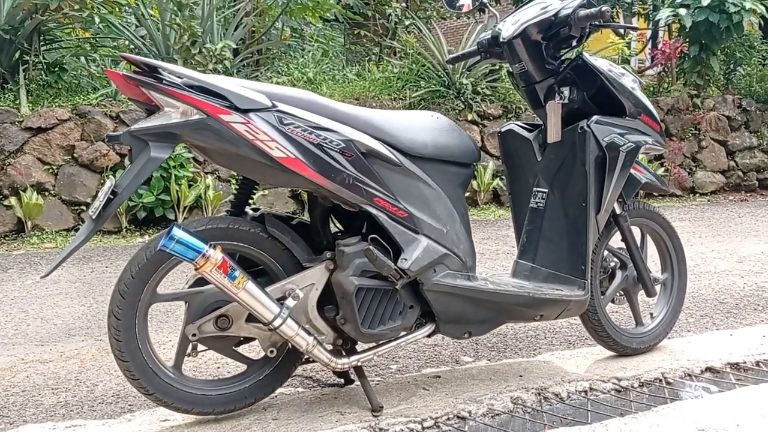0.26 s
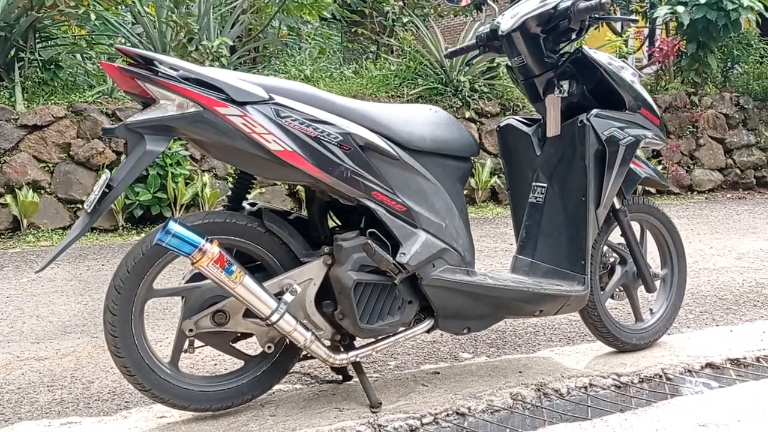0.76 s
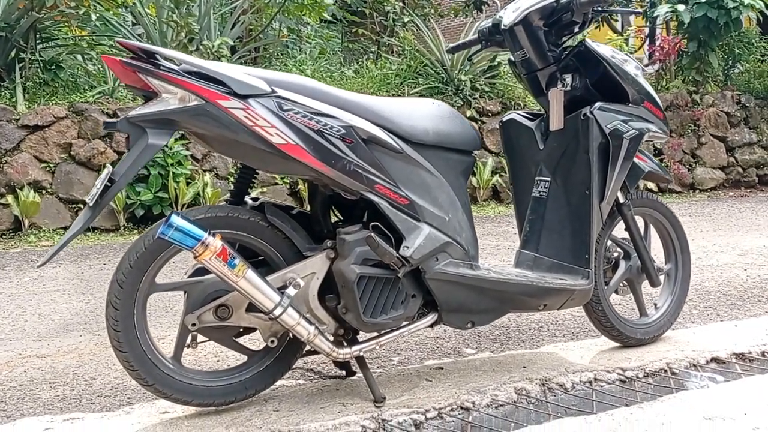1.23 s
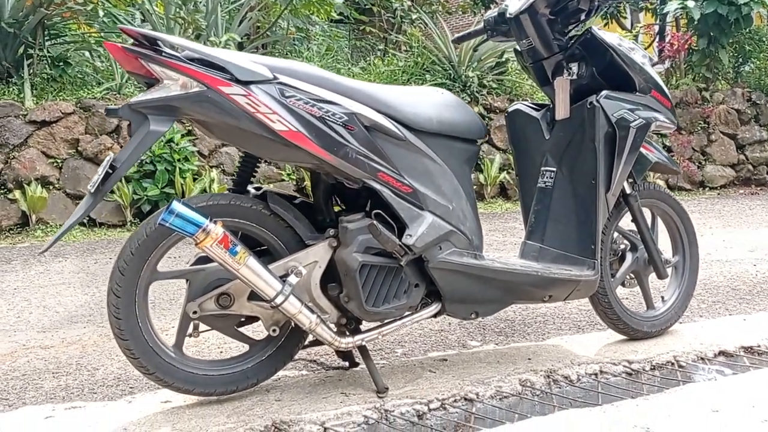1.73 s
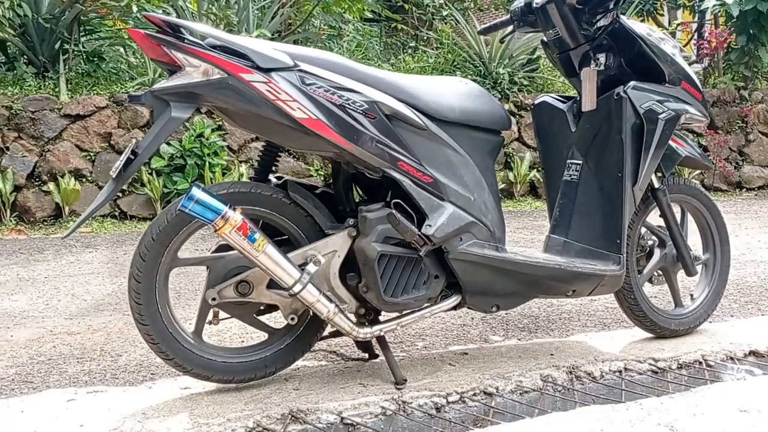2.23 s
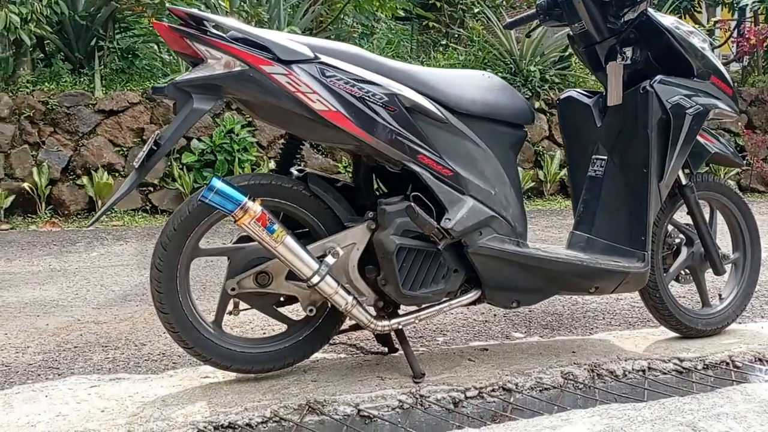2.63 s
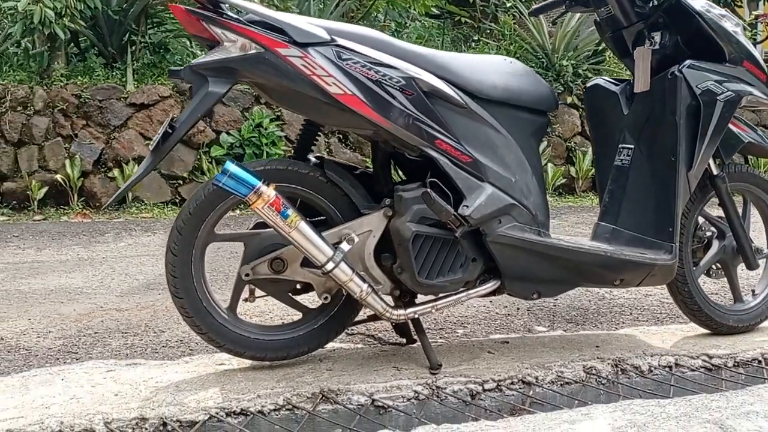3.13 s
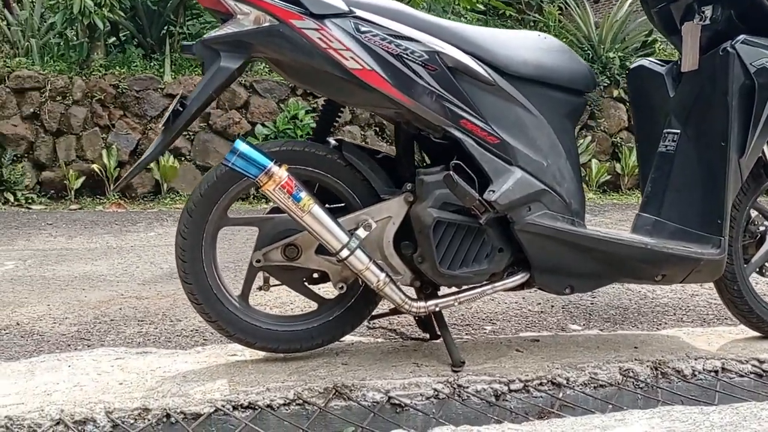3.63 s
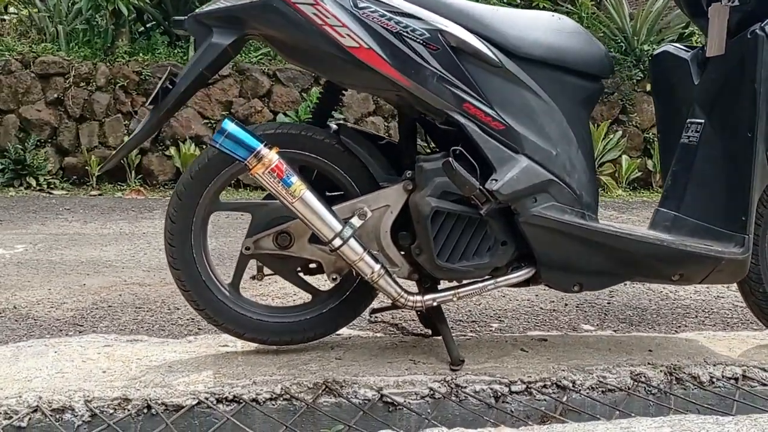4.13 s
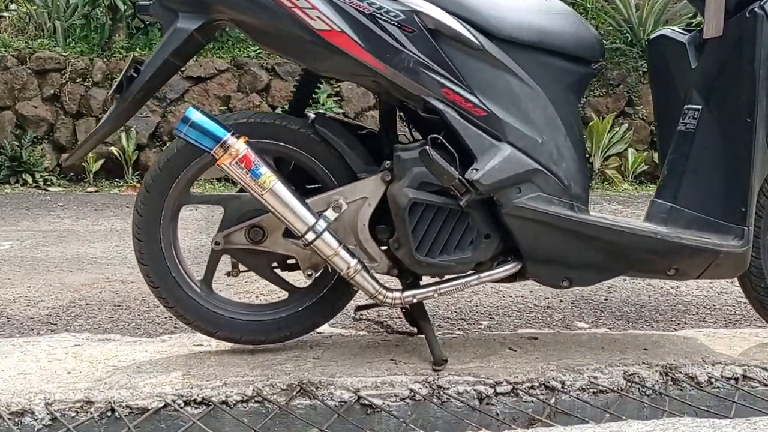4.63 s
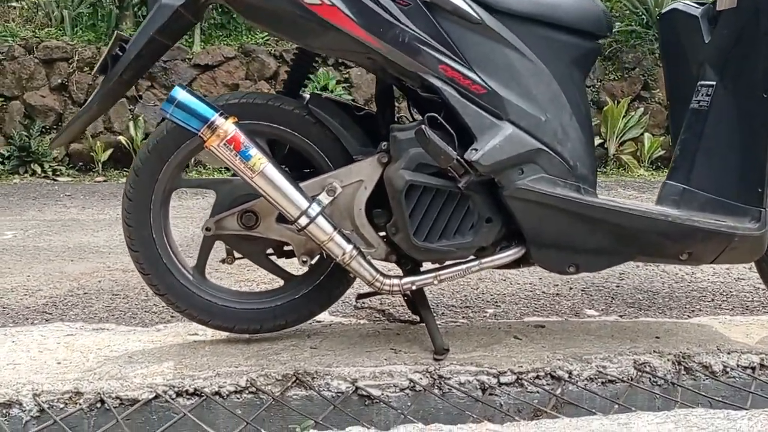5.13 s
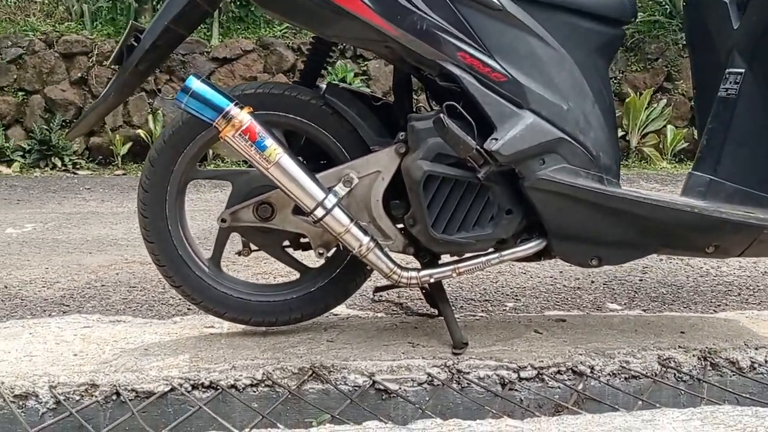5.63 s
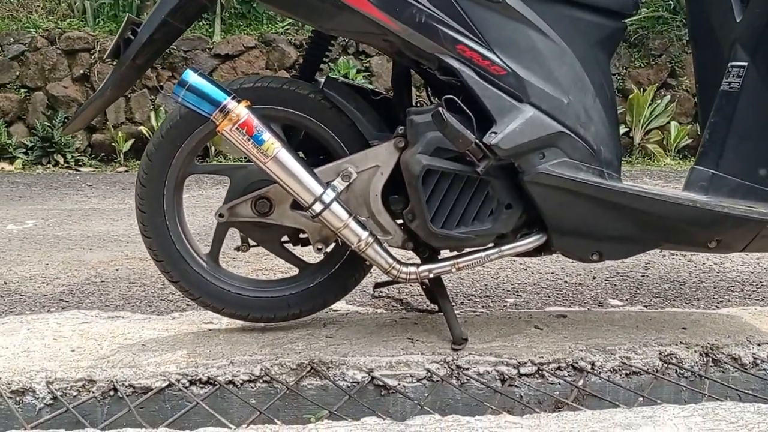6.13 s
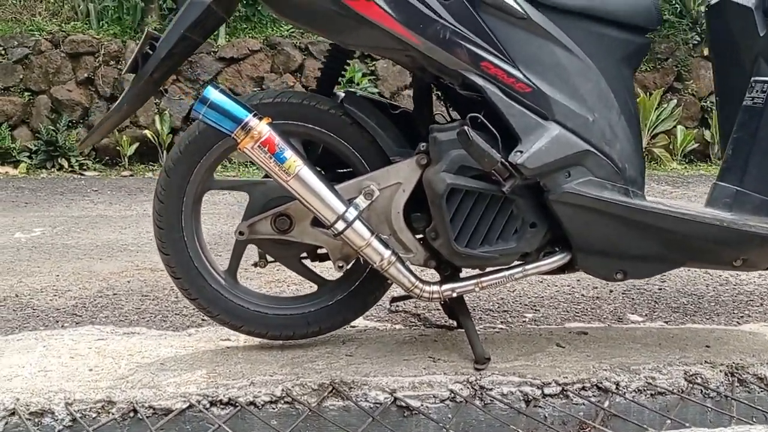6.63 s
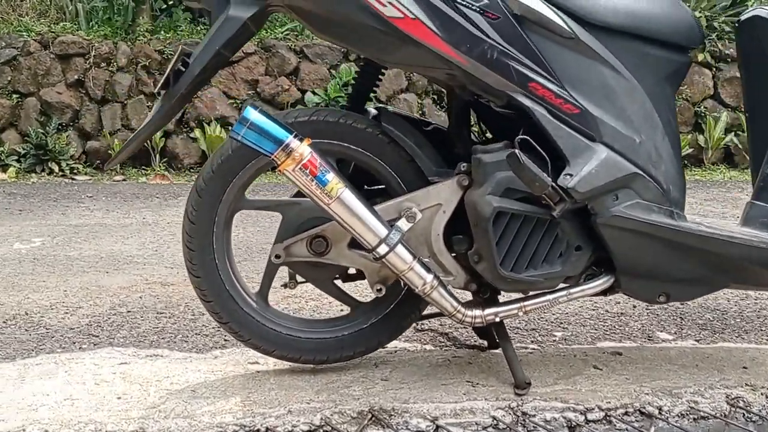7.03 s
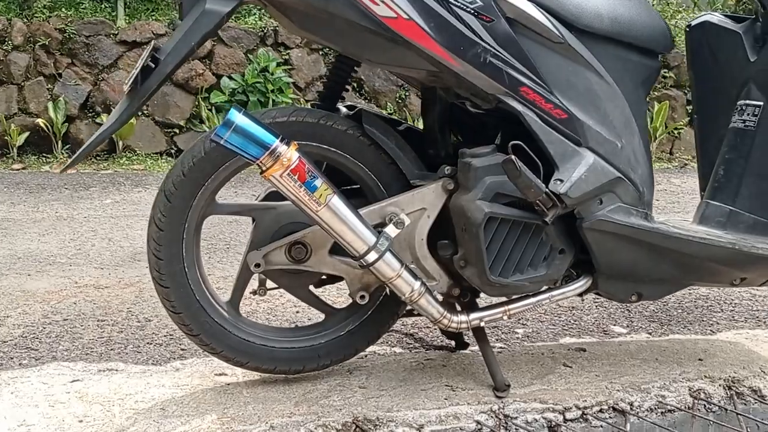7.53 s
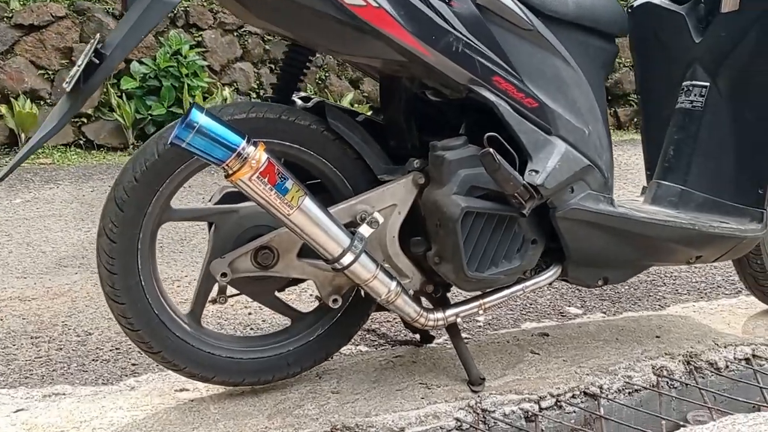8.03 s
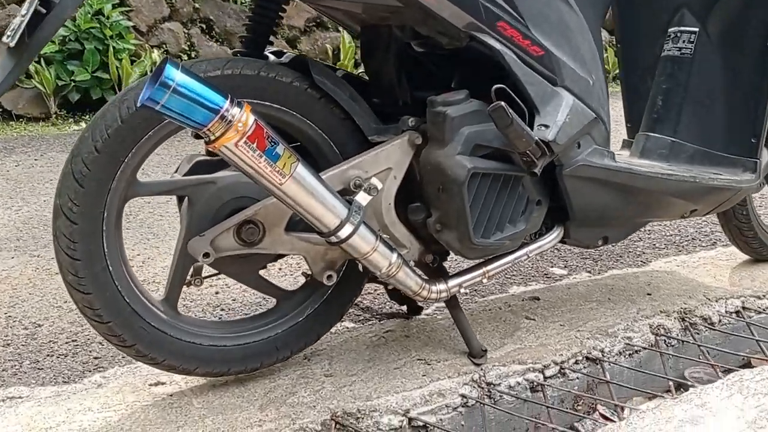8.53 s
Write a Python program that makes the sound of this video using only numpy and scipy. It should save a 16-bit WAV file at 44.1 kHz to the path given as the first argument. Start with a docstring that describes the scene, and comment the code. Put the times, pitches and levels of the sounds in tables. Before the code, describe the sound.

A standing single-cylinder scooter runs loudly through an open exhaust, close to the microphone on a road. It holds a little throttle for a second, drops to a quieter, uneven lope, then builds into a hard idle with occasional misfires. Each firing thumps, rings the steel muffler and spits hissing gas, over whirring and valve clatter. A bird whistles faintly early on. Near the end the microphone nears the outlet and there is one dull knock.

```python
"""On a road, a standing single-cylinder scooter barks through an open exhaust, close to the microphone.
It runs on a little throttle for a second, drops, lopes with every other firing weak, then idles hard.
Each firing is a pressure pulse that thumps through the pipe, rings the steel can and blows a jet of gas.
Fan, belt and valves whir and clack behind it, and a bird calls faintly from the bushes.
Near the end the microphone nears the outlet, and there is one dull knock."""
import sys
import numpy as np
from scipy import signal
from scipy.fft import rfft, irfft, next_fast_len
from scipy.io import wavfile

SR = 44100
rng = np.random.default_rng(int(sys.argv[2]) if len(sys.argv) > 2 else 0)


def transcribe(signal):
    """Save signal, clipped to [-1, 1], as a 16-bit WAV file at the path in sys.argv[1]."""
    frames = np.atleast_2d(signal).T
    limited = np.clip(frames, -1, 1)
    pcm = np.round(limited * 32767).astype(np.int16)
    wavfile.write(sys.argv[1], SR, pcm)


N = 387198

# pipe resonances at idle: (frequency [Hz], width [Hz], level [dB])
IDLE_MODES = [(141, 317.6, 38.9), (138.5, 59.7, 53.64), (209.2, 17.8, 56.74), (422, 119, 33.78),
              (574.5, 13.5, 24.2), (787, 394, 23), (875, 66, 26.7), (1190, 58, 14)]
# colour of the gas hiss, on throttle and at idle: (frequency [Hz], relative level [dB])
THROTTLE_HISS = [(1500, -19), (2300, -2), (3300, -4), (3900, -2.5), (4700, 0), (7300, 0.5), (8000, -15.5)]
IDLE_HISS = [(1200, -20.5), (2000, 6.5), (2500, -8), (2880, 7), (3400, -1), (5300, 0.5), (6700, 0.5),
             (7600, -13)]


def amp(db):
    """Decibels to gain."""
    return 10 ** (np.asarray(db) / 20)


def curves(rows):
    """Automation: one value per sample for each column after the time."""
    s, *cols = np.transpose(rows)
    return [np.interp(np.arange(N) / SR, s, c) for c in cols]


def accents(times, rows):
    """One value per firing for each column after the time: a row marks its nearest firing, others get 0."""
    s, *cols = np.transpose(rows)
    nearest = np.abs(times[:, None] - s).argmin(axis=0)
    return [np.bincount(nearest, c, len(times)) for c in cols]


def filtered(x, response):
    """x through a complex frequency response."""
    m = next_fast_len(N + SR // 2)
    return irfft(rfft(x, m) * response(np.fft.rfftfreq(m, 1 / SR)), m)[:N]


def noise(spectrum):
    """Noise of rms 1 with the given colour."""
    hz, db = np.transpose(spectrum)
    colour = lambda f: amp(np.interp(np.log(f + 1), np.log(hz), db, left=-60))
    x = filtered(rng.standard_normal(N), colour)
    return x / np.std(x)


def resonances(f, modes):
    """Response of ringing modes; neighbours swing in opposite senses."""
    return sum((-1) ** k * amp(db) * 1j * f * width / (hz * hz - f * f + 1j * f * width)
               for k, (hz, width, db) in enumerate(modes))


def delay(f, seconds):
    """Response of a pure delay."""
    return np.exp(-2j * np.pi * f * seconds)


def pulses(times, db):
    """One impulse at each time."""
    return np.bincount(np.clip(np.round(times * SR).astype(int), 0, N), amp(db), N + 1)[:N]


def bursts(times, db, rise, t60, shut=.1):
    """An envelope that swells to db after each time, dies away and is choked after shut seconds."""
    t = np.arange(SR // 6) / SR
    shape = (1 - np.exp(-(t / rise) ** 2)) * amp(-60 * t / t60) / (1 + (t / shut) ** 10)
    return signal.fftconvolve(pulses(times, db), shape / shape.max())[:N]


def bird(length=0.076, db=-51):
    """A bird in the bushes: faint, thin whistles, each on one pitch."""
    # calls: (time [s], pitch [Hz])
    calls = [(2.06, 6440), (2.455, 6460), (2.755, 6430), (2.83, 6240)]
    t = np.arange(N) / SR
    swell = lambda s: np.sin(np.pi * np.clip((t - s) / length, 0, 1))
    return amp(db) * sum(swell(s) * np.sin(2 * np.pi * hz * t) for s, hz in calls)


def roadside(x, t60=0.27):
    """A stone wall and bushes scatter a short, dull tail."""
    t = np.arange(SR // 3) / SR
    tail = rng.standard_normal(len(t)) * amp(-60 * t / t60) * (t > .02)
    wet = signal.fftconvolve(x, tail / np.linalg.norm(tail))[:N]
    return filtered(wet, lambda f: 1 / (1 + 1j * f / 3000))


def knock(s=7.667, db=-36):
    """One dull, hollow knock."""
    body = noise([(300, -15), (700, 3), (1000, -16), (2000, -57)])
    return bursts(np.array([s]), [db], rise=0.0045, t60=0.36) * body


def machinery(times, throttle):
    """Fan and belt whir, the intake hisses on throttle, and the valves clack twice a cycle."""
    # fader for the whole layer: (time [s], gain [dB])
    fader = [(0.0, -47), (0.68, -47.5), (1.1, -53.5), (3.99, -44), (8.36, -46), (8.78, -42)]
    # colour of the whir: (frequency [Hz], relative level [dB])
    whir_colour = [(20, 13), (400, 14), (1500, 6), (2450, 0.5), (2880, -1.5), (3500, -0.5), (4700, -3.5),
                   (5350, -0.5), (6000, -6.5), (7600, -16)]
    # valve clacks: (place in the engine cycle [0-1], relative level [dB])
    valves = [(0.349, 3.5), (.64, 0)]
    clacks = sum(bursts(times[:-1] + place * np.diff(times), db + rng.normal(0, 2.8, len(times) - 1),
                        rise=0.0019, t60=.035) for place, db in valves)
    whir = amp(4 - 2.6 * throttle) * noise(whir_colour)
    intake = amp(-6) * throttle * noise(THROTTLE_HISS)
    return amp(curves(fader)[0]) * (whir + intake + amp(-3) * clacks * noise(IDLE_HISS))


def lip_whistles(times, db, count=3):
    """At each puff the lip of the outlet whistles briefly on a few chance pitches."""
    t = np.arange(SR // 25) / SR
    shape = (1 - np.exp(-t / 0.0023)) * amp(-60 * t / 0.058)
    out = np.zeros(N + SR)
    for s, level, (pitch, softness) in zip(times, db, rng.random((len(times), 2, count))):
        hz = 2700 + 4200 * pitch[:, None]
        out[round(s * SR):][:len(t)] += shape * (amp(level - 14 * softness) @ np.sin(2 * np.pi * hz * t))
    return out[:N]


def jet(times, db, throttle):
    """Every pulse blows turbulent gas: a sharp hiss at the mouth and a rasp until the valve shuts."""
    # gas flow against pulse strength: (time [s], rasp gain [dB], hiss gain [dB])
    flow = [(0, -22.5, -17), (.88, -22, -16), (1, -18.5, -23), (2.6, -17.5, -23.5), (3.4, -18, -23),
            (8.7, -18.5, -23)]
    # colour of the rasp: (frequency [Hz], relative level [dB])
    rasp_colour = [(150, 1), (420, 1.5), (700, -4.5), (890, -3), (1100, -12.5), (1400, 0.5), (1700, -8.5),
                   (2400, -15.5), (4000, -42)]
    # sharp burns that spit harder: (time [s], extra hiss [dB])
    spits = [(2.08, 1.5), (2.6, 4.5), (4.6, 6), (5.52, 1.5), (6.04, 4), (6.77, 3)]
    rasp_db, hiss_db = curves(flow)
    rasp_scatter, spit_scatter = rng.standard_normal((len(times), 2)).T
    rasp = bursts(times - .003, db + rasp_scatter, rise=.003, t60=0.19, shut=0.031) * noise(rasp_colour)
    spit_db = db + accents(times, spits)[0] + 1.3 * spit_scatter
    puff = bursts(times - .0015, spit_db, rise=0.0019, t60=0.028)
    tail = bursts(times + .004, spit_db - 13, rise=0.0045, t60=0.15)
    hiss = (puff + tail) * (throttle * noise(THROTTLE_HISS) + (1 - throttle) * noise(IDLE_HISS))
    return amp(rasp_db) * rasp + amp(hiss_db) * (hiss + lip_whistles(times, spit_db + 1.5))


def steel_can(times, db, throttle, idle, close):
    """Each pressure front strikes the can with a little scatter in time and force: a hollow bark."""
    # ring of the can: (frequency [Hz], width [Hz], on throttle [dB], at idle [dB], by the outlet [dB])
    modes = [(774, 30, 22.5, 8.5, 0), (1004, 97, -4, 11, 26), (1119, 44, 28, 2.5, 31.5),
             (1237, 55, 13, 27.5, 23.5), (1421, 52, 10, 33, 7.5), (1546, 110, 24, 24.5, 19.5)]
    # pressure fronts of a firing, from the valve cracking open to their returns: (delay [s], level [dB])
    fronts = [(-.0042, -3.5), (.0012, -5), (.009, -9)]
    scatter = rng.standard_normal((len(times), len(fronts), 2)).T
    strikes = sum(pulses(times + s + 0.00013 * late, db + level + 1.6 * force)
                  for (s, level), late, force in zip(fronts, *scatter))
    ring = np.zeros(N)
    for k, share in enumerate([throttle, idle, close]):
        voicing = [(hz, width, levels[k]) for hz, width, *levels in modes]
        ring += filtered(strikes * share, lambda f: resonances(f, voicing) / (1 + (f / 2400) ** 4))
    return ring


def pipe(f, modes, echoes, mouth_hz=80):
    """The pipe's resonances and reflections; its small mouth radiates little deep bass."""
    reflections = 1 + sum(gain * delay(f, s) for s, gain in echoes)
    return resonances(f, modes) * reflections * (1j * f / (mouth_hz + 1j * f)) ** 2


def backflow(times, db):
    """After a feeble burn the piston sucks gas back up the pipe: a soft, late gulp."""
    feeble = times[db < -25]
    gulps = pulses(feeble + .017, np.full(len(feeble), -29.))
    return filtered(gulps, lambda f: -pipe(f, IDLE_MODES, []))


def exhaust(times, db, throttle, idle, close):
    """Each blowdown thumps through the pipe, which booms on after the valve shuts."""
    # pipe resonances on throttle, by the outlet, and valve shut: (frequency [Hz], width [Hz], level [dB])
    throttle_modes = [(88.4, 24, 48), (129, 32.3, 57.5), (155.2, 13.4, 55), (206.8, 8.8, 49),
                      (229, 57.8, 47), (308, 15, 28.5), (440, 100, 33.5), (618, 41, 36)]
    close_modes = [(126.2, 75, 54.7), (141.7, 120.8, 52.4), (186, 35, 46.16), (345, 86, 35.6),
                   (434.6, 12.7, 41.4), (568, 24, 27.5), (652, 394, 24.7), (1099, 44, 22)]
    boom_modes = [(120.6, 10, 34), (148.4, 13, 41), (201.7, 20, 42.5)]
    # reflections in the pipe and off the road, negative from an open end: (delay [s], gain [ratio])
    throttle_echoes = [(0.00091, 0.5), (0.00262, 0.76), (0.00544, 0.84), (0.0137, -0.39)]
    idle_echoes = [(0.00169, 0.47), (0.0062, -0.55), (0.0171, 0.53), (0.0176, -0.35)]
    close_echoes = [(0.00058, 0.94), (0.00149, 0.62), (0.00386, -0.9), (0.0188, -0.53)]
    train = pulses(times, db)
    thump = filtered(train * throttle, lambda f: pipe(f, throttle_modes, throttle_echoes))
    thump += filtered(train * idle, lambda f: pipe(f, IDLE_MODES, idle_echoes))
    thump -= filtered(train * close, lambda f: pipe(f, close_modes, close_echoes))
    soft_boom = lambda f: resonances(f, boom_modes) * delay(f, 0.02722) / (1 + 1j * f / 400) ** 2
    return thump + filtered(train * (idle + 0.53 * close), soft_boom)


def firings(first_s=.0182, jitter_s=.0003, scatter_db=0.58):
    """Time, thump level and bark level of each burn: an even beat, broken up by lope and misfires."""
    # engine speed: (time [s], speed [rpm])
    speed = [(0, 2066), (.41, 2068), (.84, 2049), (.93, 2156), (1.01, 1956), (1.45, 1898), (2.4, 1849),
             (2.9, 1770), (2.97, 1838), (3.18, 1738), (3.55, 1835), (4.42, 1791), (4.68, 1831),
             (5.02, 1798), (5.55, 1859), (5.81, 1848), (6.19, 1778), (6.31, 1814), (7.58, 1840),
             (8.7, 1893)]
    # strength of a normal burn: (time [s], level [dB])
    effort = [(0, -17), (.54, -14.5), (.73, -17), (.9, -16.7), (.94, -23.5), (1.25, -23), (1.7, -18.8),
              (2.4, -16), (3, -16), (3.88, -11.5), (4.1, -13.5), (4.65, -11), (5.28, -13), (5.48, -10.5),
              (5.8, -13.5), (6.62, -12), (7.02, -14.5), (7.63, -12.5), (7.9, -16), (8.55, -12.5)]
    # lope, every other burn slow and dull: (time [s], slow burn's thump [dB], swing of the bark [dB])
    lope = [(.93, 0, 0), (1.03, 1.5, 2), (1.32, 1.5, 3), (1.63, -2, 1.7), (1.75, -7.5, 0.5),
            (2.15, -8.5, 1), (2.42, -1, 1), (2.65, -0.5, 0)]
    # misfires: (time [s], loss [dB], lateness [s])
    misfires = [(2.54, 5.5, .0055), (2.87, 11, 0.0027), (4.33, 7, 0.00087), (4.86, 6, 0.00051),
                (5.39, 3, 0), (5.84, 3.5, 0.00024), (6.11, 6, 0), (7.82, 2, 0.00087), (7.95, 3, 0.0016),
                (8.46, 3.5, 0.00088), (8.59, 4.5, 0.0017)]
    rpm, = curves(speed)
    cycles = np.cumsum(rpm) / (2 * 60 * SR)  # one firing every two turns
    beats = np.arange(cycles[round(first_s * SR)], cycles[-1] - .1)
    times = np.interp(beats, cycles, np.arange(N) / SR)
    effort_db, slow_db, swing_db = (c[(times * SR).astype(int)] for c in curves(effort) + curves(lope))
    loss_db, late = accents(times, misfires)
    rebound_db = 0.11 * np.roll(loss_db, 1)  # a misfire's unburnt fuel feeds the next burn
    slow = np.arange(len(times)) % 2
    thump_db = effort_db + slow * slow_db - loss_db + rebound_db + rng.normal(0, scatter_db, len(times))
    bark_db = thump_db + swing_db * (1 - 2 * slow)
    return times + late + rng.normal(0, jitter_s, len(times)), thump_db, bark_db


def scene():
    """The engine and a knock, their faint answer from the roadside, and a bird."""
    # crossfade from throttle tone to idle as the throttle closes: (time [s], throttle [0-1])
    throttle_fade = [(.91, 1), (.945, 0.01)]
    # the microphone's move to the outlet: (time [s], closeness [0-1])
    approach = [(6.8, 0.18), (7.7, 0.73), (8.301, 1)]
    times, thump_db, bark_db = firings()
    throttle, close = curves(throttle_fade) + curves(approach)
    idle = (1 - throttle) * (1 - close)
    ring_db = thump_db + 1.5 * (bark_db - thump_db)  # the can swings wider with the lope than the jet
    engine = exhaust(times, thump_db, throttle, idle, close) + backflow(times, thump_db)
    engine += steel_can(times, ring_db, throttle, idle, close)
    # a steep high-pass takes the deepest bass off the engine's thump
    engine = filtered(engine, lambda f: 1 - 1 / (1 + (f / 52) ** 10))
    direct = engine + jet(times, bark_db, throttle) + machinery(times, throttle) + knock()
    return (direct + amp(-17) * roadside(direct) + bird())[None]


def record(dry, top_hz=8000):
    """A steep low-pass takes off the top octave."""
    return filtered(dry[0], lambda f: 1 / np.sqrt(1 + (f / top_hz) ** 90))[None]


dry = scene()
out = record(dry)
transcribe(out)
```